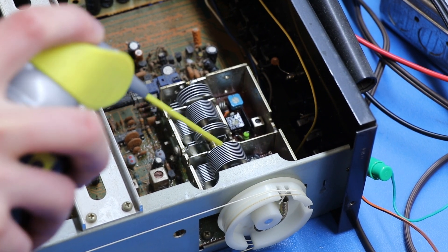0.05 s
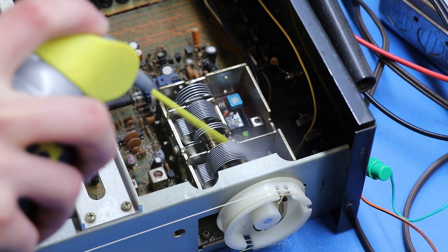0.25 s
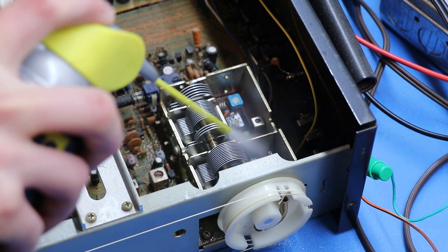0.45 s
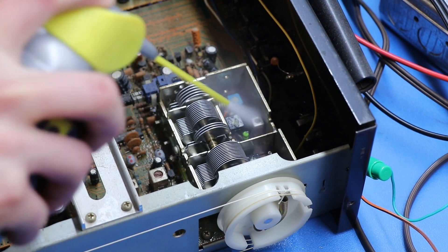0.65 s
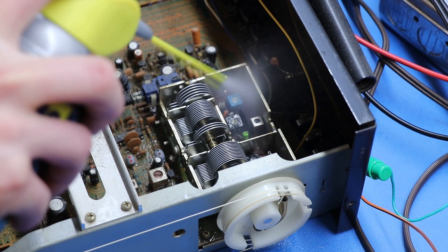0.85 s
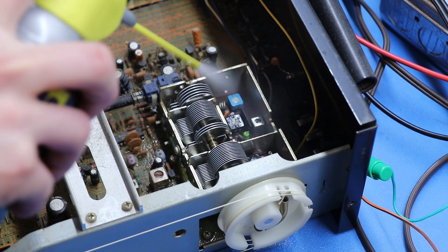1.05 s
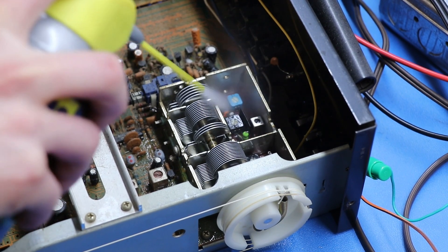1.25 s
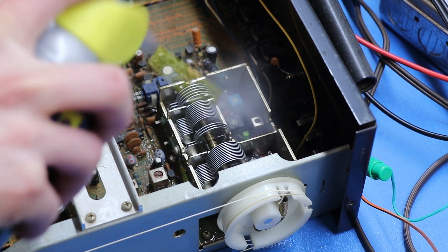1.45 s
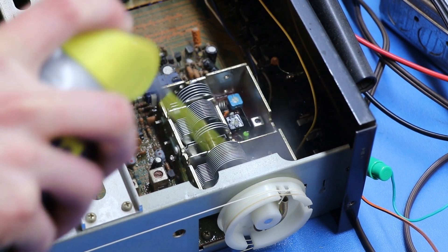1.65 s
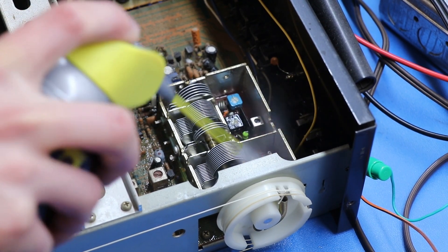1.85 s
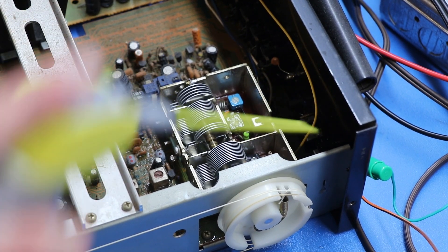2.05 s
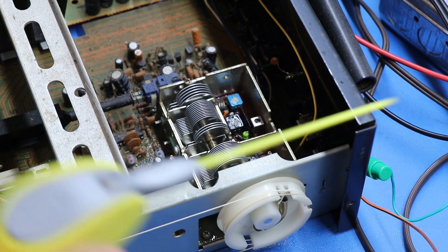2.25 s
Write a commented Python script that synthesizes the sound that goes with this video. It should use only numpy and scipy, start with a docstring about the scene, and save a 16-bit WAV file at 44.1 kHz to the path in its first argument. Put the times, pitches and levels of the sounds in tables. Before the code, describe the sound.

An aerosol can sprays through a thin straw into an open metal chassis, its bright hiss wavering as the jet sweeps over the parts. The hiss dies away with a few faint spits, close up in a quiet workshop.

```python
"""An aerosol can sprays through a thin straw into an open metal chassis on a workbench, close to a mono
microphone. Over faint room tone the valve cracks open and gas starts to hiss from the straw. The jet
sweeps to and fro over the parts, its splash bright on edges and hollow in gaps, while a few soft
contacts bump dully under it. After two seconds the valve closes, the hiss dulls and dies away,
and the straw spits its last drops."""
import sys
import numpy as np
from scipy import signal
from scipy.fft import rfft, irfft
from scipy.io import wavfile

SR = 44100
rng = np.random.default_rng(int(sys.argv[2]) if len(sys.argv) > 2 else 0)


def to_wav(s):
    """Save 16-bit WAV."""
    ch = np.atleast_2d(s).T  # columns
    pcm = np.round(np.clip(ch, -1, 1) * 32767)  # PCM
    wavfile.write(sys.argv[1], SR, pcm.astype(np.int16))


N = 101429
T = np.arange(N) / SR
OPEN_S, CLOSE_S, CLOSE_DB_PER_S = 0.14, 2.009, 239   # the valve


def from_db(db):
    """Decibels to gain."""
    return 10 ** (np.asarray(db) / 20)


def unit_power(x):
    """Scale to unit power."""
    return x / np.sqrt(np.mean(x ** 2) + 1e-20)


def at_hz(points, hz):
    """Read a spectrum on a log-frequency axis."""
    f, value = np.transpose(points)
    return np.interp(np.log(hz + 1), np.log(f), value)


def butter(x, order, hz, kind="low"):
    """Pass x through a Butterworth filter."""
    return signal.sosfilt(signal.butter(order, hz, kind, fs=SR, output="sos"), x)


def drift(rate_hz):
    """A slow random wander of spread 1."""
    r = np.exp(-2 * np.pi * rate_hz / SR)
    return unit_power(signal.lfilter([1], [1, -2 * r, r * r], rng.standard_normal(2 * N))[N:])


def noise(spectrum):
    """Steady noise of a given colour, unit power."""
    colour = from_db(at_hz(spectrum, np.fft.rfftfreq(N, 1 / SR)))
    return unit_power(irfft(rfft(rng.standard_normal(N)) * colour, N))


def clicks(rows):
    """One impulse for each (time, level) row."""
    out = np.zeros(N)
    for s, db in rows:
        out[int(s * SR)] += from_db(db)
    return out + 1e-18


def ring(x, hz, t60):
    """A unit click sets a sine of height 1 ringing."""
    r, w = from_db(-60 / (t60 * SR)), 2 * np.pi * hz / SR
    return signal.lfilter([0, np.sin(w)], [1, -2 * r * np.cos(w), r * r], x)


def envelope(s, db):
    """Gain along a level curve, silent before it and dying away after it."""
    return (T > s[0]) * from_db(np.interp(T, s, db) - CLOSE_DB_PER_S * np.maximum(T - s[-1], 0))


def hump(octaves, width):
    """The bell shape of a broad resonance, 1 at its peak."""
    return np.exp(-.5 * (octaves / width) ** 2)


# Room tone at the bench: (frequency [Hz], relative density [dB])
ROOM_SPECTRUM = [(18, -61), (30, -27), (97, -9), (114, -5), (133, 2), (152, -11), (249, -4.5), (532, -15),
                 (656, -14.5), (1550, -26), (15500, -35.5)]
def room_tone():
    """The room lies faint and low behind the close sounds."""
    return from_db(-60) * noise(ROOM_SPECTRUM)


# Hollows of the chassis, close to the microphone: (frequency [Hz], width [Hz], boost [dB])
HOLLOW_MODES = [(350,48,2),(430,42,5),(605,61,6),(773,60,7.5),(1090,18,8.5),(1187,27,7),(1305,27,3.5),(1577,40,8),(1740,17,2.5),(1895,46,3),(2087,70,3.5),(2633,30,1.5),(2666,38,3),(2710,22,5.5),(3055,22,6),(3490,150,5),(3910,26,3.5),(4136,24,1),(4370,41,4),(4550,47,4.5),(5620,120,3.5),(6750,30,7.5),(7280,270,3),(7900,55,4.5),(9060,670,2),(11160,600,3.5)]
def chassis(spray):
    """The hollows resonate and colour the spray; its overall level is kept."""
    out = spray
    for hz, width_hz, boost_db in HOLLOW_MODES:
        resonance = signal.lfilter(*signal.iirpeak(hz, hz / width_hz, fs=SR), spray)
        out = out + (from_db(boost_db) - 1) * resonance
    return unit_power(out) * spray.std()


# Soft contacts under the spray: (time [s], relative level [dB])
CONTACTS = [(.232,-30),(.241,-31),(.894,-15.5),(.910,-21.5),(.923,-27.5),(.942,-33.5)]
# Modes of the chassis and bench: (frequency [Hz], gain [dB], time to fall 60 dB [s])
BENCH_MODES = [(136,-15.5,0.27),(289,-5.5,.06),(353,-2,0.069),(410,3,0.031),(478,-0.5,0.041),(694,-8,0.037)]
def bumps():
    """Soft contacts ring the chassis and the bench under it; they radiate no deep bass."""
    push = butter(clicks(CONTACTS), 2, [133, 990], "band")
    return sum((-1) ** k * from_db(db) * ring(push, hz, t60)
               for k, (hz, db, t60) in enumerate(BENCH_MODES))


# Last drops at the tip of the straw: (time [s], relative level [dB])
SPIT_POPS = [(2.125,-26.5),(2.1475,-41),(2.159,-33),(2.1648,-24),(2.170,-24),(2.183,-36),(2.1865,-31),(2.1915,-28),(2.2007,-28),(2.246,-35)]
# The last puff of gas: (frequency [Hz], relative density [dB])
PUFF_SPECTRUM = [(40,-10.5),(150,1.5),(450,4.5),(900,-1),(2000,-9.5),(5000,-15.5),(15000,-38.5)]
def last_spits(puff_s=2.183, rise_db_per_s=55, fall_db_per_s=161):
    """The straw empties with a weak puff and a few sharp pops."""
    pops = butter(clicks(SPIT_POPS), 1, [201, 2000], "band")
    pops = butter(pops, 2, 5970)
    fade_db = np.maximum(rise_db_per_s * (puff_s - T), fall_db_per_s * (T - puff_s))
    return from_db(13) * pops + from_db(-45.5 - fade_db) * noise(PUFF_SPECTRUM)


def valve_flow(t, ramp_s=.02, full_s=.26):
    """Gas flow: a quick opening, a swell to full pressure, a steady dying away."""
    opening = np.clip((t - OPEN_S) / ramp_s, 0, 1)
    swell_db = np.interp(t, [OPEN_S + ramp_s, full_s], [-10, 0])
    return opening * from_db(swell_db - CLOSE_DB_PER_S * np.maximum(t - CLOSE_S, 0))


def lose_pressure(jet, dulling_s=.12):
    """After the valve closes the slowing jet loses its top."""
    dull = butter(jet, 1, 6000)
    return jet + np.clip((T - CLOSE_S) / dulling_s, 0, 1) * (dull - jet)


# Low rush of the mist: (frequency [Hz], relative density [dB])
RUSH_SPECTRUM = [(40,-24),(90,-15.5),(130,-17),(200,-9),(300,-3.5),(420,0.5),(560,-3),(800,-4),(1200,-6),(2500,-16)]
def rush(lag_s=0.026, flutter_db=1.5):
    """The mist rushes softly, fluttering and lagging just behind the gas flow."""
    level = from_db(-38 + flutter_db * drift(rate_hz=7.2))
    return level * valve_flow(T - lag_s) ** 0.87 * noise(RUSH_SPECTRUM)


def mist(drops_per_s=2500, spread_db=4, drop_share=0.14):
    """Turbulence mixed with the impacts of droplets of uneven size."""
    sizes = from_db(spread_db * np.minimum(rng.exponential(1, N), 4)) * rng.choice([-1, 1], N)
    drops = unit_power(sizes * (rng.random(N) < drops_per_s / SR))
    return np.sqrt(drop_share) * drops + np.sqrt(1 - drop_share) * rng.standard_normal(N)


def mist_bands(low_hz, high_hz, count):
    """Yield (centre frequency, band of mist); neighbouring bands come from independent mists."""
    edges = np.geomspace(low_hz, high_hz, count + 1)
    mists = mist(), mist()
    for k, (low, high) in enumerate(zip(edges, edges[1:])):
        yield np.sqrt(low * high), butter(mists[k % 2], 2, [low, high], "band")


# The hollow wash, swelling as the jet passes over gaps: (time [s], relative level [dB])
WASH_SWELLS = [(0.13, -80), (0.156, -51.5), (0.246, -38), (0.262, -43), (0.328, -31.5), (0.39, -43),
               (0.418, -36), (0.478, -37.5), (0.522, -25), (0.566, -32.5), (0.728, -28), (0.872, -32.5),
               (0.878, -25.5), (0.95, -26.5), (0.988, -32.5), (1.06, -35.5), (1.116, -22.5), (1.154, -26),
               (1.172, -32), (1.254, -37), (1.332, -26.5), (1.376, -34.5), (1.438, -36), (1.448, -29),
               (1.532, -25), (1.576, -36), (1.676, -27), (1.758, -35.5), (1.804, -34), (1.852, -33),
               (1.88, -27.5), (1.974, -29.5), (1.992, -23), (2.02, -33.5), (2.12, -54.5)]
# Its colour: (frequency [Hz], band gain [dB])
WASH_COLOUR = [(500,-30),(900,-8),(1150,-4.5),(1600,0),(2100,2.5),(2700,-8.5),(3600,-15),(6000,-21)]
def wash(loud_db=-25, loud_hz=1640, db_per_octave=5.5, boost_db=4):
    """The jet churns in the gaps: the deeper it reaches, the louder the wash and lower its resonance."""
    times, levels_db = np.transpose(WASH_SWELLS)
    octaves = (loud_db - np.interp(T, times, levels_db)) / db_per_octave
    out, power = 0, 0
    for hz, band in mist_bands(500, 6000, count=12):
        resonance = hump(np.log2(hz / loud_hz) - octaves, width=0.54)
        gain = from_db(at_hz(WASH_COLOUR, hz) + boost_db * resonance)
        out = out + band * gain
        power = power + gain ** 2 * band.var()
    return from_db(-1) * envelope(times, levels_db) * out / np.sqrt(power)


# Gas leaving the straw, heard close: (frequency [Hz], relative density [dB])
GAS_SPECTRUM = [(500,-22.5),(1100,-1),(1700,-2.5),(3500,5),(7500,7),(10000,4),(15500,3.5)]
def straw(pipe_hz=1770, reflection=0.51, fill_s=0.19):
    """Gas noise echoes between the two ends of the straw, until liquid fills and damps it."""
    round_trip = np.exp(-2j * np.pi * np.fft.rfftfreq(N, 1 / SR) / pipe_hz)
    piped = unit_power(irfft(rfft(noise(GAS_SPECTRUM)) / (1 - reflection * round_trip), N))
    empty = np.exp(-np.maximum(T - OPEN_S, 0) / fill_s)
    hiss = np.sqrt(empty) * piped + np.sqrt(1 - empty) * noise(GAS_SPECTRUM)
    return from_db(-26) * valve_flow(T) * hiss


# The jet's sweep over the parts, close up: (time [s], level [dB], centre of colour [Hz])
JET_SWEEP = [(0.13, -67, 6240), (0.162, -44, 5830), (0.224, -31.5, 5700), (0.262, -24.5, 7680),
             (0.324, -22, 5610), (0.372, -23.5, 6770), (0.428, -22.5, 6300), (0.478, -23.5, 7300),
             (0.522, -20, 5300), (0.534, -21.5, 5060), (0.572, -19, 6800), (0.638, -19, 5900),
             (0.684, -18.5, 4660), (0.712, -22, 5000), (0.756, -21.5, 4990), (0.81, -16, 6500),
             (0.85, -18.5, 6870), (0.888, -20.5, 5190), (0.932, -25.5, 5000), (0.96, -17.5, 5740),
             (0.982, -20.5, 7200), (1.004, -19.5, 7300), (1.076, -18.5, 6900), (1.144, -22, 5140),
             (1.182, -19, 6470), (1.194, -16.5, 6430), (1.244, -19, 6940), (1.294, -18.5, 5270),
             (1.338, -20, 5040), (1.388, -23.5, 7550), (1.416, -22.5, 7620), (1.438, -22.5, 6000),
             (1.454, -17, 5210), (1.482, -21.5, 5050), (1.51, -21, 5550), (1.536, -16.5, 5360),
             (1.582, -21.5, 6040), (1.642, -16.5, 5370), (1.686, -20, 4330), (1.736, -20.5, 6300),
             (1.82, -16, 5840), (1.836, -22.5, 6230), (1.876, -18, 4220), (1.914, -16.5, 4950),
             (1.964, -22, 5040), (2.002, -30.5, 3060), (2.074, -48.5, 3980), (2.12, -57, 3120)]
# Splash colour with the centre at mid_hz: (frequency [Hz], band gain [dB])
SPLASH_COLOUR = [(1000,-28),(1700,-14.5),(2600,-3),(3800,-2),(5200,1.5),(6300,-2),(8600,-0.5),(10000,-6.5),(12500,-6.5),(15500,-7)]
# How each band follows the centre: (frequency [Hz], gain change [dB per octave of centre])
SPLASH_LEAN = [(1500,-4),(2600,-14),(3600,-7.5),(5200,1),(7500,3),(14000,9)]
def splash(mid_hz=5600, boost_db=2.5, flutter_db=1.75):
    """The jet hits the parts; its colour leans with the sweep and each band flutters a little."""
    times, levels_db, centres_hz = np.transpose(JET_SWEEP)
    octaves = np.interp(T, times, np.log2(centres_hz / mid_hz))
    out, power = 0, 0
    for hz, band in mist_bands(900, 17000, count=18):
        resonance = hump(np.log2(hz / mid_hz) - 1.66 * octaves, width=0.34)   # travels with the centre
        lean_db = at_hz(SPLASH_LEAN, hz) * octaves
        gain = from_db(at_hz(SPLASH_COLOUR, hz) + lean_db + boost_db * resonance)
        out = out + band * gain * from_db(flutter_db * drift(rate_hz=21))
        power = power + gain ** 2 * band.var()
    return envelope(times, levels_db) * out / np.sqrt(power)


def scene():
    """Spray, bumps, spits and room meet at one microphone, alike in both channels."""
    jet = rush() + straw() + splash() + wash()
    sputter = from_db(0.89 * drift(rate_hz=57))   # uneven liquid in the jet
    spray = chassis(lose_pressure(jet * sputter))
    mono = spray + bumps() + last_spits() + room_tone()
    return np.array([mono, mono])


def record(dry):
    """The top is cut steeply above 15750 Hz."""
    return signal.sosfilt(signal.ellip(12, .1, 85, 15750, fs=SR, output="sos"), dry)


dry = scene()
out = record(dry)
to_wav(out)
```